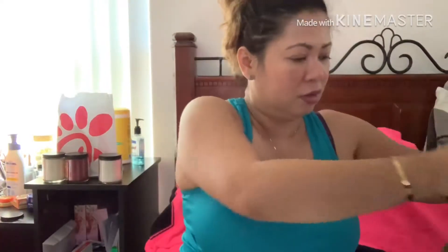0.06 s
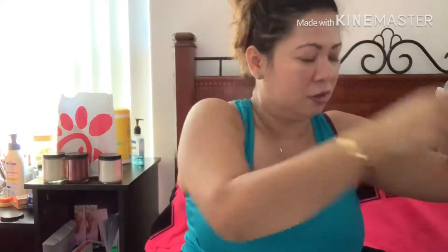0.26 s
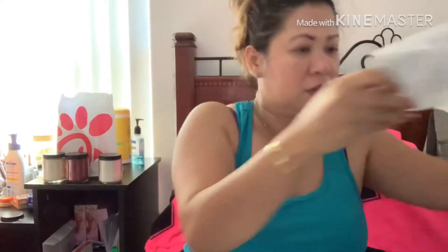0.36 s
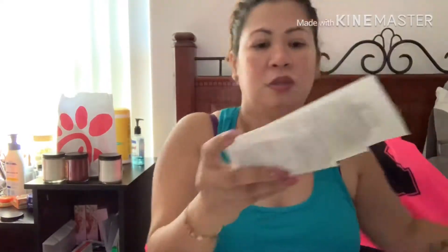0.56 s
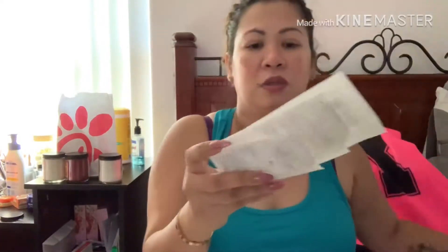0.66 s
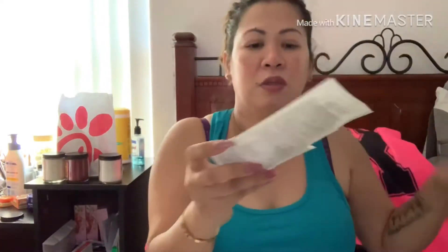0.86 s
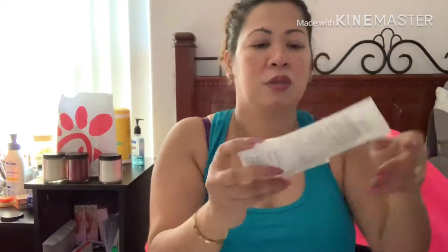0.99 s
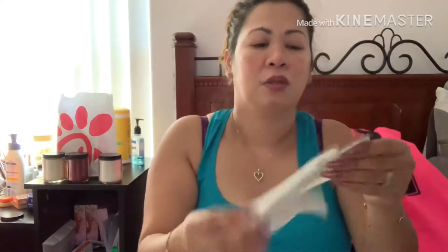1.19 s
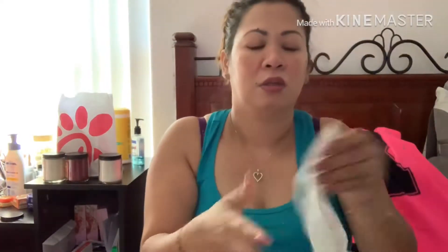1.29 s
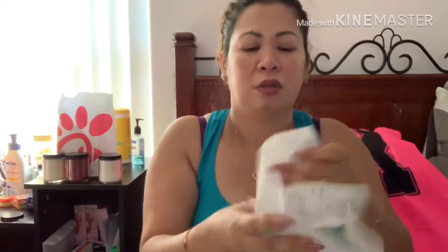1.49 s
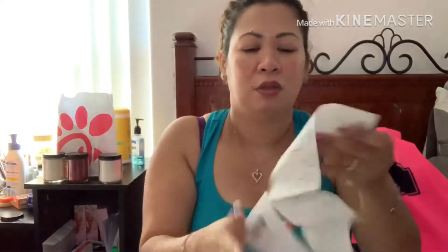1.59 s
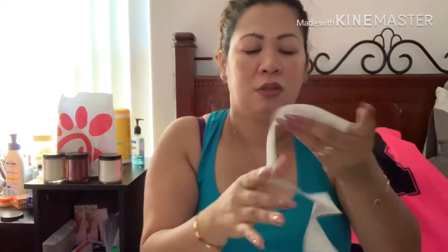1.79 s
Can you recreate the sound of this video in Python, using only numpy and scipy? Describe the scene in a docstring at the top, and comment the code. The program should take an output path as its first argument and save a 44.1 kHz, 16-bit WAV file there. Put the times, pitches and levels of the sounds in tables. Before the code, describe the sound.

Paper crinkles and rustles in a small bedroom over a faint low hum. For the first second, a hand rummages in stiff packing off to one side, with ticks, hollow crumples and soft knocks, strongest near 0.3 seconds. From about 1.1 seconds a thin sheet slides through the fingers close to the microphone, crackling, then snaps taut around 1.55 seconds and fades by 1.8.

```python
"""Paper handled in a small bedroom, on a closely spaced stereo microphone over a low room hum.
First, off to one side, a hand rummages in paper packing, which ticks, crumples and pops hollowly.
After a second a thin sheet is pulled open in front of the microphone: it slides through the fingers,
crackles and snaps taut. Crackle and rustle are swarms of tiny buckles, pops are whole panels flipping.
The paper leaves a short room tail, and the hands knock softly along the way."""
import sys
import numpy as np
from scipy import signal
from scipy.fft import rfft, irfft, next_fast_len
from scipy.io import wavfile

SR = 44100
rng = np.random.default_rng(int(sys.argv[2]) if len(sys.argv) > 2 else 0)


def to_wav(s):
    """Save 16-bit WAV."""
    ch = np.atleast_2d(s).T  # columns
    pcm = np.round(np.clip(ch, -1, 1) * 32767)  # PCM
    wavfile.write(sys.argv[1], SR, pcm.astype(np.int16))


N = 81585


def sheet():
    """Thin paper straight in front of the microphone: it slides through the fingers, crackles and snaps."""
    # collapsing folds [t/s, body level/dB, crisp level/dB, decay/s]
    crackles = [(1.0786, -75, -25.5, 0.0007), (1.136, -34, -35.5, 0.0023), (1.1410, -26, -32.5, 0.0047),
                (1.150, -38, -64, 0.012), (1.2415, -27, -44, 0.0018), (1.2475, -29.5, -26.5, 0.0025),
                (1.505, -25, -16, 0.0019), (1.556, -54, -14.5, 0.00056), (1.5625, -27, -49, 0.0082),
                (1.6155, -63, -31.5, 0.0071), (1.722, -42.5, -44.5, 0.01)]
    # panels snapping taut [t/s, level/dB, start f/Hz, end f/Hz, life/s]
    snaps = [(1.143, -32, 2350, 590, 0.0011), (1.5565, -10, 3040, 1150, 0.00055),
             (1.5572, -15.5, 880, 600, 0.0011)]
    # rustle of the slide [t/s, level/dB]
    slide = [(1.06, -77), (1.12, -59.5), (1.19, -50), (1.24, -40.5), (1.345, -56.5), (1.37, -44),
             (1.405, -55.5), (1.455, -41.5), (1.49, -49), (1.515, -36), (1.538, -46.5), (1.555, -32.5),
             (1.585, -47), (1.61, -42.5), (1.645, -48.5), (1.72, -52.5), (1.79, -64)]
    # spectra of a fold's body, its crisp edge and the rustle [f/Hz, level/dB]
    body_colour = [(200, -15), (400, -22), (600, -4.5), (830, -3), (1080, -14.5), (1500, 1), (2400, -9.5),
                   (3500, -6.5), (7000, -18)]
    crisp_colour = [(800, -28), (1800, 6), (3000, 0.5), (5200, 10), (6200, 7.5), (7500, 2), (9000, 4.5),
                    (16000, 4.5)]
    rustle_colour = [(200, -1), (500, -2), (800, 3.5), (1080, -2), (1600, 3), (8000, -0.5), (16000, -2)]
    body = buckles(body_colour, per_s=7000, spread_db=5.5)
    crisp = buckles(crisp_colour, per_s=8200, spread_db=5.5)
    rustle = level(slide) * buckles(rustle_colour, per_s=11000, spread_db=5.5)
    paper = creases(crackles, body, crisp) + pops(snaps) + rustle
    return in_bedroom(paper, left_lead_s=0, room_db=-15.5)


def packing():
    """Stiff paper off to one side, with more room on it: ticks, hollow crumples and a rustle between."""
    # collapsing folds [t/s, body level/dB, crisp level/dB, decay/s]
    crumples = [(.2135, -41, -36, 0.0064), (.2185, -26.5, -34, 0.0053), (.2415, -25, -28, 0.011),
                (.264, -28.5, -29, 0.0066), (.2685, -39, -23.5, 0.0088), (.278, -19, -32, 0.0053),
                (.2845, -12.5, -25, 0.0069), (.2885, -20, -20, 0.0037), (.3105, -35, -31, 0.0085),
                (.376, -37, -33.5, 0.0081), (.5045, -30, -35, 0.016), (.5595, -28, -48, 0.0072),
                (.669, -31, -35.5, 0.011), (.7125, -31, -32, 0.015), (.7218, -27.5, -39, 0.014),
                (.7685, -28, -36, 0.0068), (.786, -27.5, -47, 0.0056), (.8118, -44, -28.5, 0.0085),
                (.828, -28.5, -55, 0.0039)]
    # small creases ticking [t/s, level/dB, f/Hz]
    ticks = [(0.023, -32, 2240), (0.048, -42, 9000), (0.0595, -40, 9000), (0.0704, -30, 9100),
             (0.084, -23, 12200), (0.2692, -12, 11900), (0.285, -19, 12000), (0.2882, -12, 11700),
             (0.439, -36.5, 13000), (0.4933, -42, 6500), (0.8548, -39, 9000), (0.875, -39, 9150)]
    # panels flipping [t/s, level/dB, start f/Hz, end f/Hz, life/s]
    flips = [(.2865, -32, 1100, 285, 0.0022), (.7232, -26, 1680, 302, 0.0033)]
    # midrange, treble and bass of the rustle [t/s, level/dB]
    body_curve = [(.1, -56), (.2, -70), (.235, -41.5), (.27, -38), (.3, -34), (.36, -44.5), (.48, -53),
                  (.53, -47), (.8, -45.5), (1.0, -63)]
    crisp_curve = [(0, -56.5), (.1, -62.5), (.17, -73), (.23, -56), (.35, -43.5), (.45, -69), (.52, -53.5),
                   (.69, -44.5), (.76, -51), (.85, -53.5), (.95, -57.5), (1.0, -70)]
    thud_curve = [(.05, -49), (.19, -54), (.295, -35), (.34, -42.5), (.47, -54.5), (.66, -50.5),
                  (.735, -52.5), (.83, -45), (.93, -58.5)]
    # spectra of the hollow body, the crisp edge and the bass [f/Hz, level/dB]
    body_colour = [(100, -11), (230, 0.5), (320, 2.5), (400, 1), (630, 3), (850, -4), (1270, -1.5),
                   (1450, -3), (2100, -6), (2900, -11), (5000, -29.5)]
    crisp_colour = [(900, -20), (2000, 8.5), (4400, 2), (6000, 2.5), (7200, -5.5), (16000, -4.5)]
    thud_colour = [(25, -51), (55, -11), (100, 3), (250, 0), (340, -5.5), (600, -32)]
    body = lambda: buckles(body_colour, per_s=7000, spread_db=2.5)
    crisp = lambda: buckles(crisp_colour, per_s=24000, spread_db=2.5)
    paper = creases(crumples, body(), crisp()) + pops(flips) + flaps()
    paper += level(body_curve) * body() + level(crisp_curve) * crisp()
    paper += level(thud_curve) * unit(coloured(rng.standard_normal(N), thud_colour))
    tick_octaves = .67  # half-width of a tick's band
    for start, db, hz in ticks:
        band = lambda f: 1 / (1 + (np.log2((f + 1) / hz) / tick_octaves) ** 2)
        tick = unit(filtered(rng.standard_normal(N), band))
        paper += burst(tick, start, db, decay_s=.0017)
    return in_bedroom(paper, left_lead_s=.00012, room_db=-5.5)


def buckles(colour, per_s, spread_db):
    """Paper buckling in many tiny spots: random impulses of uneven size, filtered to the given colour."""
    size = amp(spread_db * np.clip(rng.standard_normal(N), -2, 2))
    sign = rng.choice([-1, 1], N)
    buckling = rng.random(N) < per_s / SR
    return coloured(unit(size * sign * buckling), colour)


def creases(rows, body, crisp):
    """Each collapsing fold sounds a body and a crisp edge."""
    return sum(burst(body, start, body_db, decay_s) + burst(crisp, start, crisp_db, decay_s)
               for start, body_db, crisp_db, decay_s in rows)


def burst(swarm, start, db, decay_s):
    """A sudden run of buckles that dies away; it rises in a fifth of its decay time."""
    t = since(start)
    envelope = (1 - np.exp(-t / (.2 * decay_s))) * np.exp(-t / decay_s)
    run = swarm * envelope
    return amp(db) * run * np.linalg.norm(envelope) / (np.linalg.norm(run) + 1e-12)


def pops(rows, lowcut_hz=510):
    """A panel flips: fast bending waves arrive before slow ones, so pitch falls; it radiates little bass."""
    out = np.zeros(N)
    for start, db, start_hz, end_hz, life_s in rows:
        t = since(start)
        hz = end_hz + (start_hz - end_hz) * np.exp(-t / life_s)
        phase = 2 * np.pi * np.cumsum(hz * (t > 0)) / SR
        out += amp(db) * np.sin(phase) * np.exp(-(t / life_s) ** 2 / 2)
    return signal.sosfilt(signal.butter(2, lowcut_hz, 'high', fs=SR, output='sos'), out)


def flaps(rise_s=.0018, t60_s=.084):
    """The packing flaps and its hollow rings briefly, a little retuned each time it is bent."""
    # flaps of the packing [t/s, level/dB, pitch ratio]
    bends = [(.2885, -31.5, 1.08), (.506, -35.5, 1.02), (0.5619, -32.5, 0.96), (0.7227, -31, 0.9)]
    # modes of the hollow before bending [f/Hz, level/dB]
    modes = [(318, -0.5), (520, 2), (1250, -8.5), (1640, 1)]
    out = np.zeros(N)
    for start, db, ratio in bends:
        t = since(start)
        ring = sum(amp(mode_db) * np.sin(2 * np.pi * (ratio * hz * t + rng.random()))
                   for hz, mode_db in modes)
        out += amp(db - 60 * t / t60_s) * (1 - np.exp(-t / rise_s)) * ring
    return out


def bumps(rise_s=.0018, decay_s=.016):
    """Hands and packing knock softly: low damped tones, dry and centred."""
    # handling knocks [t/s, level/dB, f/Hz]
    knocks = [(0.242, -27.5, 168), (0.2887, -21.5, 126.6), (0.721, -28, 89), (.742, -35, 217),
              (1.026, -39.5, 154), (1.383, -39.5, 95), (1.56, -38, 138.5)]
    out = np.zeros(N)
    for start, db, hz in knocks:
        t = since(start)
        out += amp(db) * np.sin(2 * np.pi * hz * t) * (1 - np.exp(-t / rise_s)) * np.exp(-t / decay_s)
    return out


def in_bedroom(paper, left_lead_s, room_db):
    """Direct sound plus room tail; the buckles beam their treble unevenly to the microphone's two ports."""
    room = room_tail(paper)
    beam_db, beam_corner_hz, beams_per_s = 2, 2020, 700
    beam = np.interp(np.arange(N) * beams_per_s / SR, np.arange(N), rng.standard_normal(N))
    treble = filtered(paper, lambda f: 1j * f / (f + beam_corner_hz))
    ports = np.array([[1], [-1]])  # left, right
    beamed = paper + ports * amp(beam_db) * beam * treble
    direct = filtered(beamed, lambda f: np.exp(1j * np.pi * f * left_lead_s * ports))
    return direct + amp(room_db) * room


def room_tail(paper, predelay_s=.004):
    """The bedroom's short reverberation, alike at both ports in the bass and wide in the treble."""
    # reverberation time [f/Hz, T60/s]
    t60 = [(150, 0.1), (1500, 0.082), (12000, 0.14)]
    hz, t, noise = signal.stft(rng.standard_normal((2, SR // 2)), SR, nperseg=256)
    decay = amp(-60 * t / along(t60, hz)[:, None])
    coherence = np.sinc(hz / 1800)[:, None]
    angle = np.arccos(coherence) / 2
    mid, side = signal.istft(noise * decay * np.array([np.cos(angle), np.sin(angle)]), SR, nperseg=256)[1]
    tail = np.pad([mid + side, mid - side], ((0, 0), (int(predelay_s * SR), 0)))
    return signal.fftconvolve(paper[None], tail / np.linalg.norm(tail[0]), axes=1)[:, :N]


def room_hum(common_db=-53):
    """Room tone: steady low noise, nearly the same at both ports."""
    # spectrum of the hum [f/Hz, level/dB]
    colour = [(25, -12.5), (60, -1.5), (110, -8.5), (165, 2), (340, -20.5), (460, -5), (750, -38.5),
              (3000, -33), (14000, -73)]
    common, left, right = [unit(coloured(rng.standard_normal(N), colour)) for _ in range(3)]
    return amp(common_db) * (common + amp(-13.5) * np.array([left, right]))


def amp(db):
    """Decibels to gain."""
    return 10 ** (np.asarray(db) / 20)


def unit(x):
    """Scale to rms 1."""
    return x / np.sqrt(np.mean(x ** 2) + 1e-20)


def since(start):
    """Seconds since start at each sample, zero before it."""
    return np.maximum(np.arange(N) / SR - start, 0)


def along(points, hz):
    """Read [f/Hz, value] points on a log frequency axis."""
    f, values = np.transpose(points)
    return np.interp(np.log(hz + 1), np.log(f + 1), values)


def level(points):
    """Gain per sample from [t/s, level/dB] points."""
    return amp(np.interp(np.arange(N) / SR, *np.transpose(points)))


def filtered(x, response):
    """Filter x by a function of frequency."""
    size = 2 * next_fast_len(N)
    return irfft(rfft(x, size) * response(np.fft.rfftfreq(size, 1 / SR)), size)[..., :N]


def coloured(x, spectrum, size=2048):
    """Pass x through a minimum-phase filter of unit energy, shaped by [f/Hz, level/dB] points."""
    gain = amp(along(spectrum, np.fft.rfftfreq(size, 1 / SR)))
    cepstrum = irfft(np.log(gain))
    cepstrum[1:size // 2] *= 2
    cepstrum[size // 2 + 1:] = 0
    ring = irfft(np.exp(rfft(cepstrum)))
    return signal.fftconvolve(x, ring / np.linalg.norm(ring))[:N]


def scene():
    """Packing, then sheet, over handling knocks and room tone."""
    return packing() + sheet() + bumps() + room_hum()


def record(dry, top_hz=15900):
    """The microphone: uneven treble, a right channel that is louder in the highs, and a band limit."""
    # microphone response [f/Hz, level/dB]
    response = [(9300, 1.5), (10500, -6.5), (11500, 2.5), (12300, 4.5), (14200, -5.5), (15100, -13.5),
                (15800, 4)]
    # right channel over left [f/Hz, level/dB]
    balance = [(1100, 0), (4000, 3), (12000, 0.5)]
    tilt = np.array([[-.5], [.5]])
    return filtered(dry, lambda hz: amp(along(response, hz) + tilt * along(balance, hz)) * (hz < top_hz))


dry = scene()
out = record(dry)
to_wav(out)
```